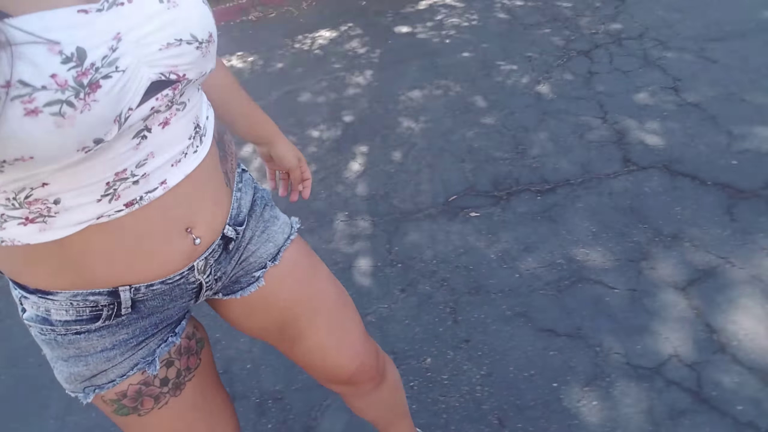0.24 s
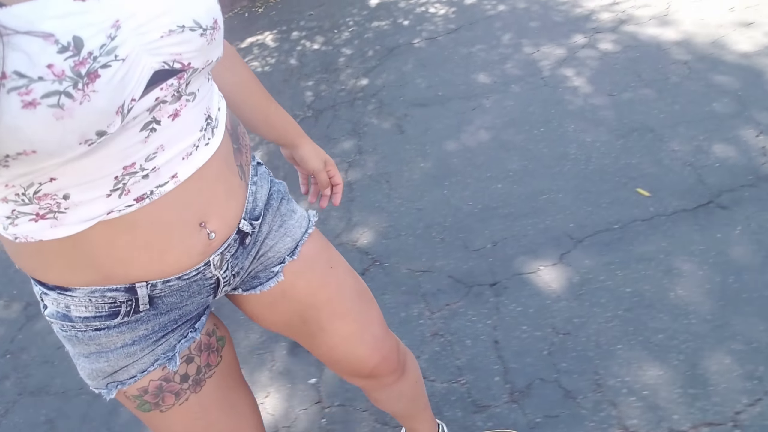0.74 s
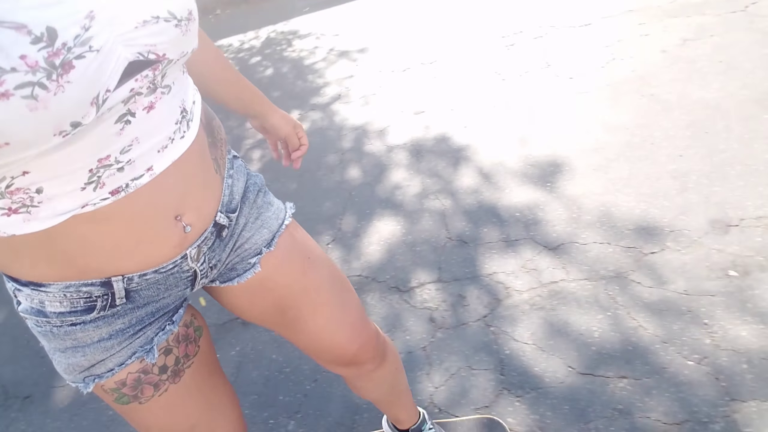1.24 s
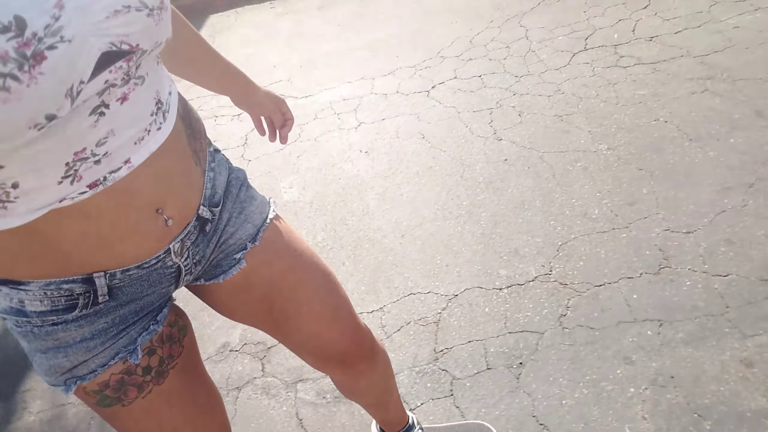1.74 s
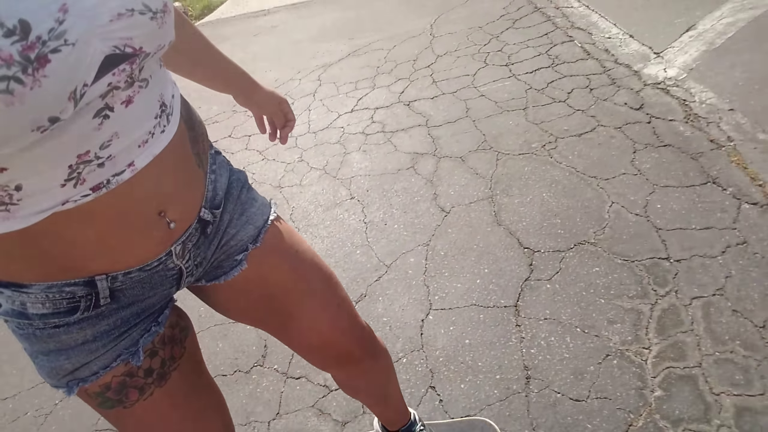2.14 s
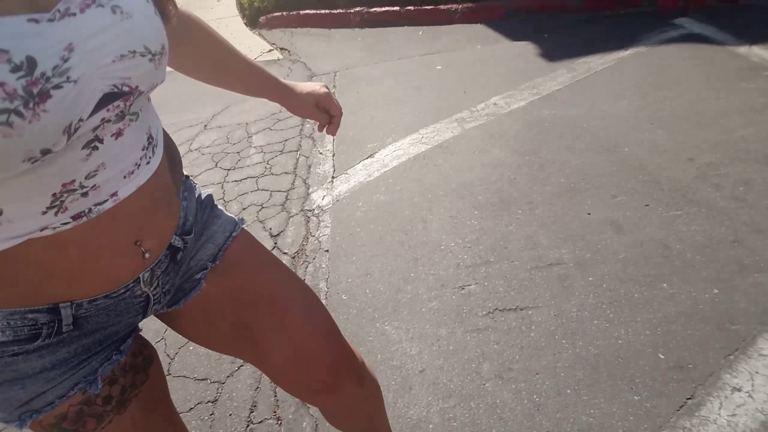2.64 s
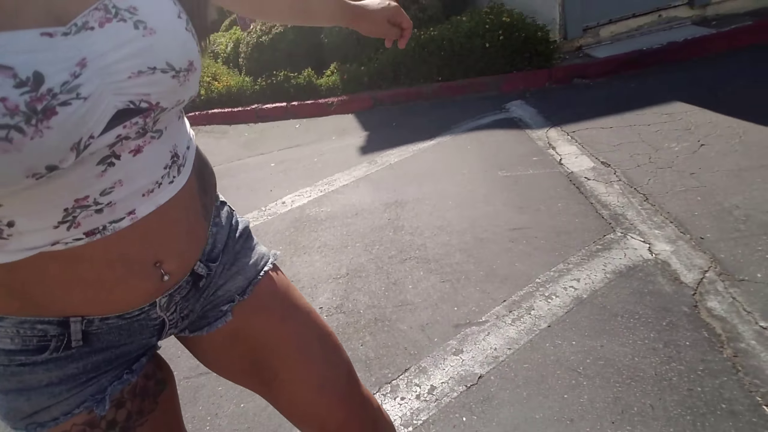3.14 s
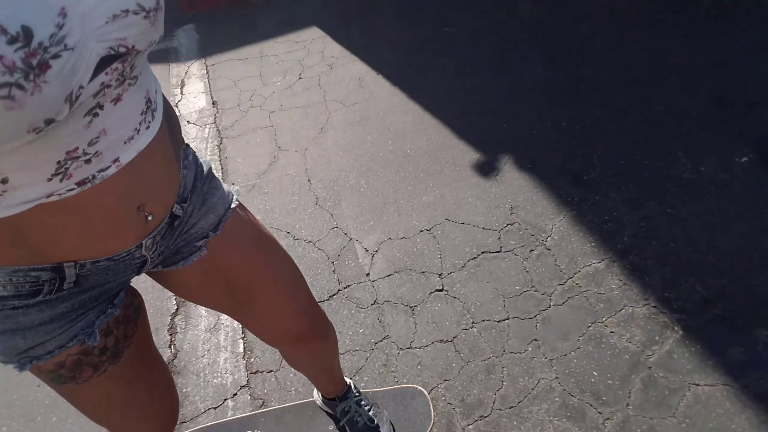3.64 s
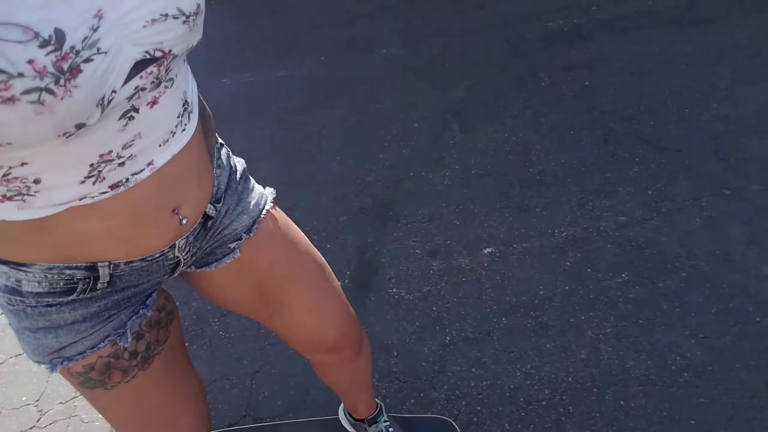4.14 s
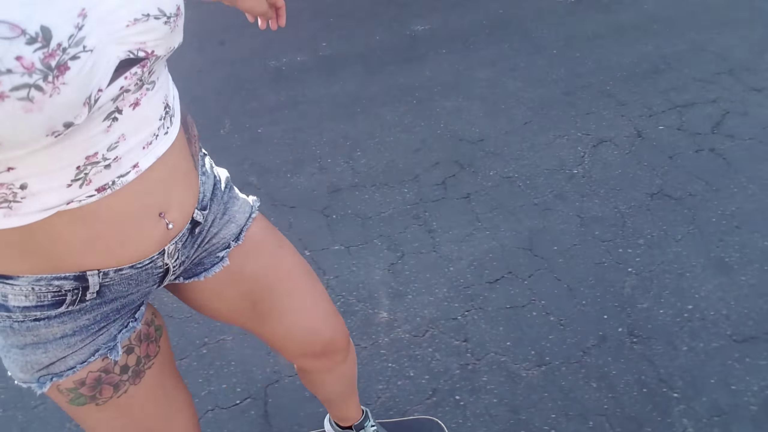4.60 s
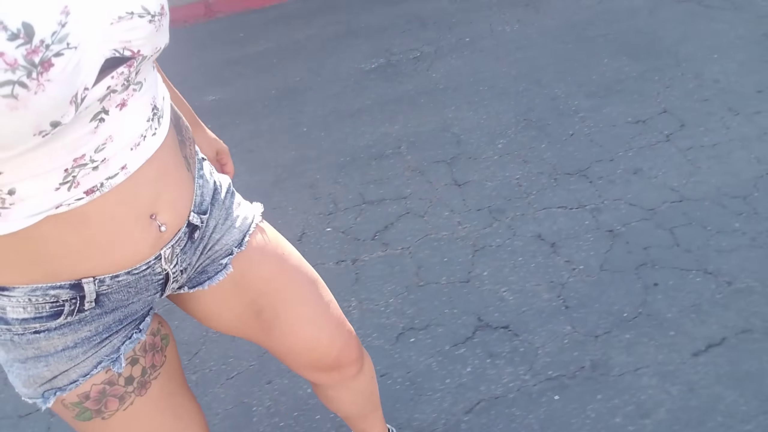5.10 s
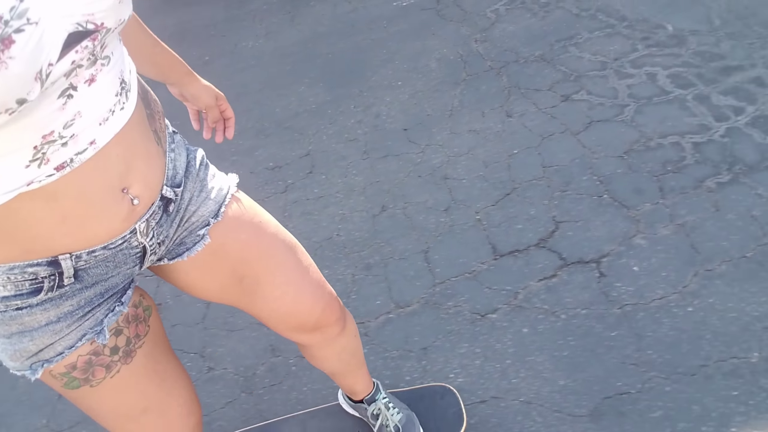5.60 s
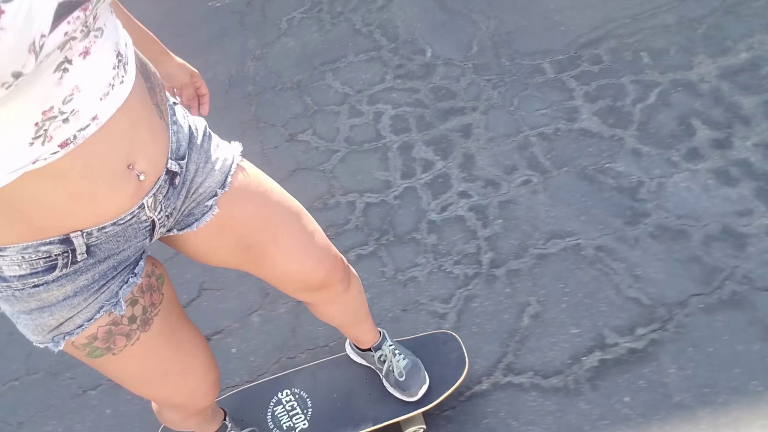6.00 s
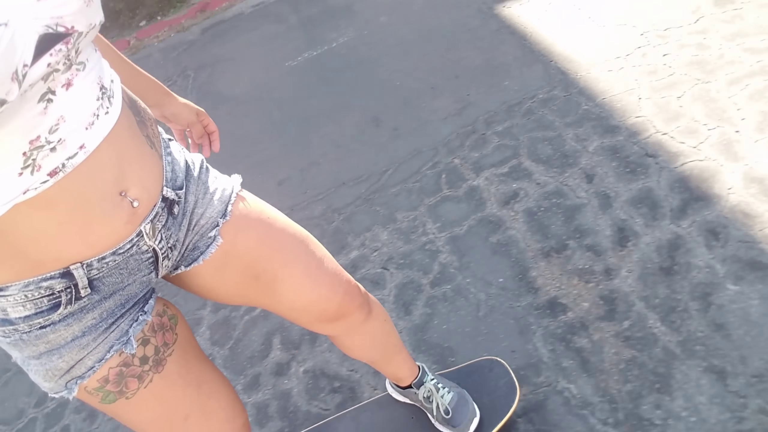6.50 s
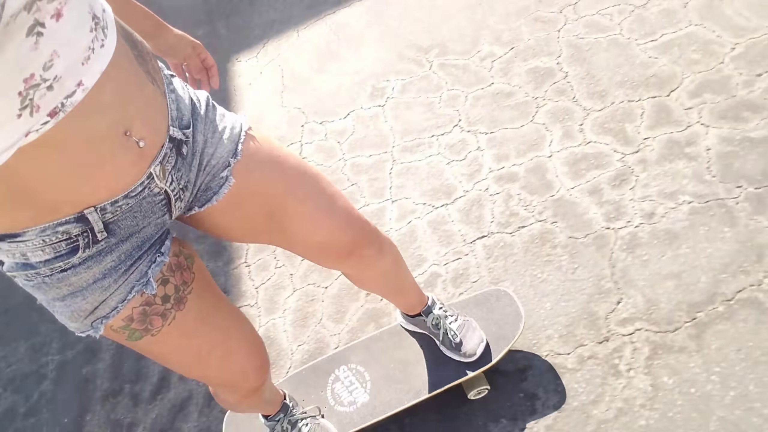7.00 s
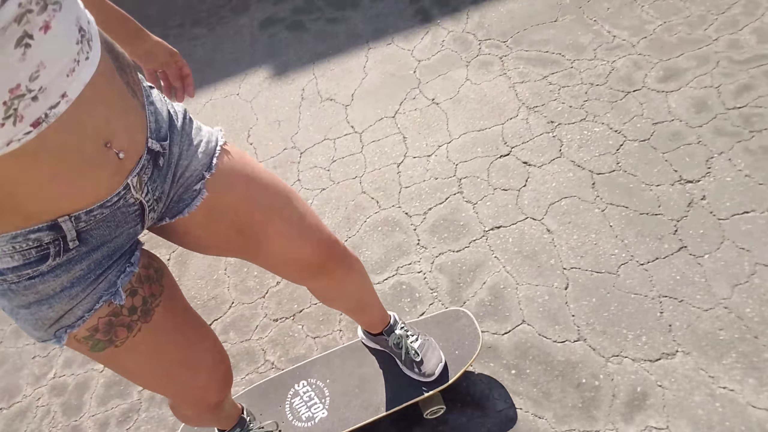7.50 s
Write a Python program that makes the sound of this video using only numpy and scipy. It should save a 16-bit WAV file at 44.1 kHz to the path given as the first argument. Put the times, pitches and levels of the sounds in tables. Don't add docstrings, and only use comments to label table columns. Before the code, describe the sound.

Hollow, rumbling skateboard roll on crazed pavement, wheels and trucks chattering, cracks clacking sharply and the deck thumping over bumps outdoors.

```python
import sys
import numpy as np
from scipy import signal
from scipy.io import wavfile

SR = 44100
rng = np.random.default_rng(int(sys.argv[2]) if len(sys.argv) > 2 else 0)


def makeup_ratio(level_db):
    decades = np.asarray(level_db, float) / 20
    return 10 ** decades


def int16_out(signal):
    q = np.round(np.clip(np.atleast_2d(signal).T, -1, 1) * 32767)
    wavfile.write(sys.argv[1], SR, q.astype(np.int16))


N = 341775


def rms_one(x):
    return x / np.sqrt(np.mean(x ** 2) + 1e-20)


def in_time(rows):
    s, level = np.transpose(rows)
    return np.interp(np.arange(N) / SR, s, level)


def at_hz(points, hz):
    table_hz, value = np.transpose(points)
    return np.interp(np.log(hz), np.log(table_hz), value)


def drift(rate):
    r = np.exp(-40 * np.pi * rate / SR)
    white = rng.standard_normal(N // 20 + 2002)
    slow = signal.lfilter([1], [1, -2 * r, r * r], white)[2000:]
    return np.interp(np.arange(N) / 20, np.arange(len(slow)), rms_one(slow))


def stones(per_s, spread_db):
    size_db = spread_db * np.minimum(rng.exponential(1, N), 5)
    sizes = makeup_ratio(size_db) * rng.choice([-1, 1], N)
    return rms_one(sizes * (rng.random(N) < per_s / SR))


def resonate(x, hz, width_hz, count=2):
    r = np.exp(-np.pi * width_hz / SR)
    b = (1 - r * r) / 2 * np.array([1, 0, -1])
    a = [1, -2 * r * np.cos(2 * np.pi * hz / SR), r * r]
    for _ in range(count):
        x = signal.lfilter(b, a, x)
    return x


# (frequency [Hz], lag [rad])
LEFT_LAG = [(60, 0), (800, .55), (1400, .7), (2000, .3), (2700, -.4), (4300, -1.5), (8200, 1.2),
            (12000, -1.8)]
# (frequency [Hz], level [dB])
LEAN = [(60, -7), (110, 0), (200, -3), (380, 1), (700, 3), (1290, -5), (2380, -6.5), (4400, 1.5),
        (8120, -11.5), (15000, -4.5)]


def stereo_band(white, low, high, *likeness):
    band = signal.butter(2, [low, high], "band", fs=SR, output="sos")
    mid, side = signal.sosfilt(band, white)
    hz = np.sqrt(low * high)
    lag = round(at_hz(LEFT_LAG, hz) * SR / (2 * np.pi * hz))
    mid = np.array([np.roll(mid, lag), mid])
    side = side * [[1], [-1]]
    lean = makeup_ratio(at_hz(LEAN, hz) / 2 * np.array([[1], [-1]]))
    return [(np.sqrt(1 + c) * mid + np.sqrt(1 - c) * side) * lean for c in likeness]


# (time [s], level [dB])
BREEZE = [(0.0, -39), (0.35, -39.5), (0.8, -42.5), (1.2, -56.5), (2.4, -51), (3.4, -56), (4.15, -50),
          (4.5, -53.5), (5.5, -54), (6.1, -47), (6.4, -55), (6.8, -49), (7.75, -52.5)]
# (frequency [Hz], density [dB per Hz])
GUST = [(12, -38), (20, -16), (76, -1.5), (140, -0.5), (188, -4), (226, -6), (260, 7.5), (340, -32),
        (570, -120)]
# (frequency [Hz], likeness [0-1])
LIKENESS = [(60, .15), (130, .55), (250, .9), (900, .65), (1400, .65), (2000, .3), (2700, .6), (4300, .4),
            (5500, .05), (8200, .4), (10000, .15), (13000, .25)]


def wind():
    edges = 20 * 2 ** np.arange(0, 4.1, .5)
    white = rng.standard_normal((2, 2, N))
    lumps = makeup_ratio(1.8 * np.array([drift(8), drift(8)]))
    turbulence = 0
    for k, (low, high) in enumerate(zip(edges, edges[1:])):
        hz = np.sqrt(low * high)
        band, = stereo_band(white[k % 2], low, high, at_hz(LIKENESS, hz))
        turbulence = turbulence + makeup_ratio(at_hz(GUST, hz)) * band
    return makeup_ratio(in_time(BREEZE) + 13.5) * rms_one(turbulence * lumps)


USUAL_DB = -21.5
RATTLE_DB, RATTLE_FOLLOWS = -45.5, 0.55
GRIT_DB, GRIT_FOLLOWS = -56, 1
GRIT_PER_PATCH_DB = 0.91
# (time [s], level [dB])
ROAD = [(0.0, -21), (0.7, -21.5), (0.92, -18.5), (1.3, -22.5), (2.54, -21), (2.62, -15.5), (2.8, -16.5),
        (2.88, -31), (3.05, -27.5), (3.58, -25.5), (3.66, -21.5), (5.9, -22), (6.07, -17.5), (6.33, -22),
        (6.62, -21.5), (6.88, -16.5), (7.08, -20), (7.75, -23)]
# (middle [s], half length [s], extra rattle [dB])
PATCHES = [(0.01, .06, 3), (0.318, .08, 2), (0.798, .07, 3.5), (1.097, .08, 4.5), (1.915, .09, 3),
           (2.385, .07, 2), (3.996, .1, 5), (4.278, .09, 3), (4.672, .11, 5), (5.217, .12, 3),
           (5.799, .09, 3), (6.042, .04, 4.5), (6.232, .05, 6), (6.699, .11, 4.5), (6.879, .06, 3.5),
           (7.358, .08, 5)]


def surface():
    road_db, t = in_time(ROAD), np.arange(N) / SR
    loose_db = sum(db * np.exp(-((t - s) / half) ** 2) for s, half, db in PATCHES)
    swing_db = road_db - USUAL_DB
    rattle_db = RATTLE_DB + RATTLE_FOLLOWS * swing_db + loose_db
    grit_db = GRIT_DB + GRIT_FOLLOWS * swing_db + GRIT_PER_PATCH_DB * loose_db
    return road_db, rattle_db, grit_db


SNAP_MS = 3
CHIPS_COUNT, CHIP_MS = 60, 3.5
CHIP_DB, CHIP_SPREAD_DB, CHIP_HZ, CHIP_SPREAD_OCTAVES = -42.5, 3.5, 2700, .4
CHIP_SIZZLE_DB, CHIP_SIZZLE_SPREAD_DB = -1, 6
# (time [s], clack [dB], ring [Hz], sizzle above 7 kHz [dB], length [ms])
CRACKS = [(0.8557, -32.5, 2400, -28, 5.3), (1.1498, -47, 1550, -44, 4.6), (1.4419, -36, 1550, -39, 8.3),
          (1.5046, -42, 2240, -41, 10), (2.3546, -38.5, 4300, -34, 7.4), (2.6135, -37, 2620, -36, 16),
          (2.66, -26.5, 2770, -34, 28), (2.7546, -28.5, 2060, -52, 6.9), (2.7766, -32, 1350, -45, 25),
          (3.6406, -23.5, 3430, -34, 5.4), (3.7704, -27, 1870, -34, 18), (4.1973, -34.5, 3200, -52, 5.2),
          (4.6524, -36.5, 2110, -37, 8.2), (4.8023, -28.5, 2030, -47, 7), (4.817, -28, 1890, -45, 28),
          (5.1988, -37, 1520, -44, 6.8), (5.7963, -31.5, 2680, -39, 20), (6.05, -25.5, 1540, -39, 17),
          (6.1263, -24.5, 1530, -40, 12), (6.156, -31, 1390, -38, 11), (6.2646, -33.5, 3500, -37, 12.3),
          (6.4446, -31.5, 2780, -36.5, 20), (6.934, -36, 3740, -44, 7.8), (7.46, -41.5, 3250, -37, 8.3)]
# (time [s], clack [dB], ring [Hz], sizzle above 7 kHz [dB])
SNAPS = [(0.006, -27.5, 2720, -26), (0.2083, -36, 2240, -55), (0.5817, -34, 2050, -54),
         (0.6125, -38, 5100, -31), (0.785, -38, 2410, -30), (0.917, -37, 2760, -55),
         (1.0444, -50, 3250, -35), (2.0641, -30, 5970, -43), (2.392, -39, 2410, -35),
         (2.516, -35, 6200, -28.5), (2.5662, -25, 2850, -27), (2.735, -27, 2270, -57),
         (3.674, -34.5, 3440, -37), (3.72, -34, 2020, -55), (3.986, -33.5, 4670, -56),
         (4.12, -40, 3470, -43), (4.2368, -35, 3240, -48), (5.0389, -33.5, 2820, -32),
         (5.352, -35.5, 2800, -42), (5.743, -35.5, 4330, -32), (5.833, -30.5, 2930, -36),
         (5.9652, -35, 2930, -34), (6.0263, -30, 2570, -39), (6.1043, -29, 2700, -29),
         (6.146, -27.5, 4700, -48), (6.1966, -34, 2760, -34), (6.2572, -36, 3180, -23.5),
         (6.7247, -37, 2760, -35), (7.572, -35.5, 5170, -32), (7.627, -43, 6370, -32)]


def contacts():
    shaken = np.cumsum(makeup_ratio(surface()[1]))
    where = rng.random(CHIPS_COUNT)
    size, pitch, bright = rng.standard_normal((3, CHIPS_COUNT))
    s = np.interp(where, shaken / shaken[-1], np.arange(N) / SR)
    clack_db = CHIP_DB + CHIP_SPREAD_DB * size
    ring_hz = CHIP_HZ * 2 ** (CHIP_SPREAD_OCTAVES * pitch)
    sizzle_db = clack_db + CHIP_SIZZLE_DB + CHIP_SIZZLE_SPREAD_DB * bright
    chips = np.transpose([s, clack_db, ring_hz, sizzle_db, np.full(CHIPS_COUNT, CHIP_MS)])
    snaps = [(*snap, SNAP_MS) for snap in SNAPS]
    return [*CRACKS, *snaps, *chips]


def clacks():
    rings, spray = np.zeros(N + 2000), np.zeros((2, N + 2000))
    t = np.arange(-400, 1600) / SR
    for s, clack_db, hz, sizzle_db, length_ms in contacts():
        length = np.clip(length_ms, 1, 15) / 1000
        shape = np.exp(np.where(t < 0, t / (.3 * length), -t / (.55 * length)))
        burst = rng.standard_normal(2000) * shape
        ring = resonate(burst, hz, 0.23 * hz)
        crackle = resonate(burst, hz, 1.0 * hz)
        i = round(s * SR)
        rings[i:i + 2000] += makeup_ratio(clack_db) * (ring / np.abs(ring).max() + 1.54 * crackle)
        spray[:, i:i + 2000] += makeup_ratio([[clack_db], [sizzle_db]]) * shape
    return rings[400:N + 400], spray[:, 400:N + 400]


# (frequency [Hz], density [dB per Hz])
RATTLE = [(500, -30), (850, 0), (891, -1.5), (978, -1), (3120, -13.5), (3990, -19), (5230, -11.5),
          (7090, -34.5), (8160, -24), (11700, -22.5), (14000, -26)]


def rattle(rattle_db, grit_db, judder):
    edges = 800 * 2 ** np.arange(0, 4.4, 1 / 3)
    white = 0.74 * rng.standard_normal((2, 2, N)) + 0.29 * stones(1400, 2.0)
    rings, (thud, sizzle) = clacks()
    low_bed, grit_bed, hits = np.zeros((3, 2, N))
    chatter = drift(200)
    for k, (low, high) in enumerate(zip(edges, edges[1:])):
        hz = np.sqrt(low * high)
        diffuse, direct = stereo_band(white[k % 2], low, high, at_hz(LIKENESS, hz), .6)
        own_db = 1.2 * drift(25)
        jump = .9 + .55 * np.log2(hz / 1000)
        shake_db = jump * (judder + .9 * chatter) + own_db
        bed = grit_bed if hz > 6500 else low_bed
        bed += diffuse * makeup_ratio(at_hz(RATTLE, hz) + shake_db)
        if hz < 7200:
            hits += direct * makeup_ratio(12 - 7.1 * np.log2(hz / 1500)) * thud
        else:
            hits += direct * makeup_ratio(2.5) * sizzle
    hits = hits * makeup_ratio(2.2 * chatter) + makeup_ratio(1.5) * rings * makeup_ratio([[-2.2], [2.2]])
    return makeup_ratio(rattle_db + 4) * rms_one(low_bed) + makeup_ratio(grit_db + 5.5) * rms_one(grit_bed) + hits


# (frequency [Hz], width [Hz], level [dB])
DECK = [(201.6, 130, -21), (297.6, 76, -6.5), (464, 103.5, -9), (532, 73, 2), (588, 101.7, -3),
        (736.3, 89.7, -9.5)]


def wood(push):
    modes = enumerate(DECK)
    return sum((-1) ** k * makeup_ratio(db) * resonate(push, hz, width_hz) for k, (hz, width_hz, db) in modes)


SWELL_S = 0.004023
# (time [s], peak level [dB])
BUMPS = [(0.008, -11.5), (0.03, -17), (0.301, -13.5), (0.802, -6.5), (1.149, -12), (1.579, -15),
         (2.657, -15), (2.682, -10.5), (2.714, -13), (2.772, -8), (2.782, -3.5), (3.638, -7.5),
         (3.738, -8.5), (3.772, -2.5), (3.823, -12.5), (4.199, -7), (4.819, -6), (5.252, -8.5),
         (5.378, -10.5), (5.419, -12.5), (5.586, -17), (5.807, -4.5), (6.052, -7.5), (6.129, -4),
         (6.146, -8), (6.271, -4), (6.937, -6), (6.993, -8.5), (7.198, -14), (7.356, -13)]


def knocks():
    s, strength_db = np.transpose(BUMPS)
    at = np.round((s - SWELL_S) * SR).astype(int)
    knocked = 0
    for k, (hz, width_hz, db) in enumerate(DECK):
        stagger = rng.integers(-60, 60, len(BUMPS))
        harder_db = .5 * (strength_db + 10.0) * np.log2(hz / 540)
        bumps = np.full(N, 1e-18)
        bumps[at + stagger] = makeup_ratio(strength_db + db + harder_db)
        knocked = knocked + (-1) ** k * resonate(bumps, hz, 0.89 * width_hz)
    return makeup_ratio(43.5) * knocked


def deck(drone_db, judder):
    grain = stones(1500, 1.9) * makeup_ratio(0.74 * judder)
    near = makeup_ratio(drone_db - 0.22) * rms_one(wood(grain)) + knocks()
    scattered = makeup_ratio(drone_db - 31) * rms_one(wood(rng.standard_normal(N)))
    late = np.interp(np.arange(N) - 4, np.arange(N), near)
    return np.array([makeup_ratio(1.0) * late + scattered, makeup_ratio(3.0) * near - scattered])


def scene():
    drone_db, rattle_db, grit_db = surface()
    judder = .3 * drift(15) + .7 * drift(45)
    return wind() + rattle(rattle_db, grit_db, judder) + deck(drone_db, judder)


def roll_off(x):
    return signal.sosfilt(signal.butter(12, 15690, fs=SR, output="sos"), x)


# (frequency [Hz], width [Hz], left [dB], right [dB])
PORTS = [(1340, 62, 0, 1.5), (3250, 610, 2, 4.5), (7000, 1300, 1, -2), (8040, 196, -5, 9),
         (11600, 400, 0, 3.5)]


def record(dry):
    for hz, width_hz, left_db, right_db in PORTS:
        dry = dry + (makeup_ratio([[left_db], [right_db]]) - 1) * resonate(dry, hz, width_hz, count=1)
    rounded = 1.099 * np.tanh(dry / 1.294)
    top_cut = signal.butter(16, 14300, fs=SR, output="sos")
    return roll_off(signal.sosfilt(top_cut, rounded))


dry = scene()
out = record(dry)
int16_out(out)
```